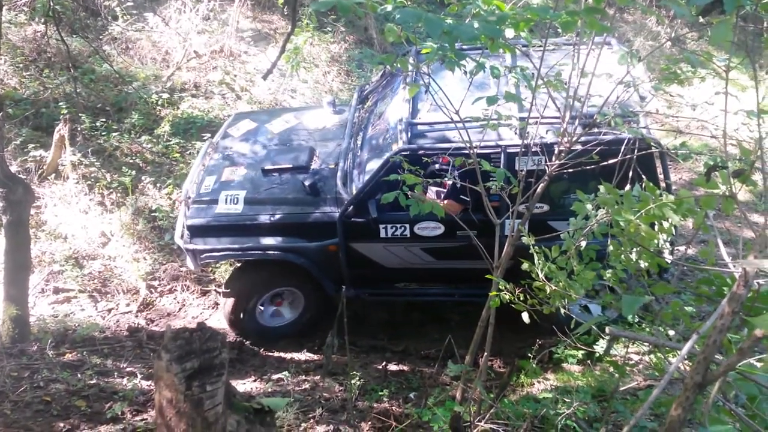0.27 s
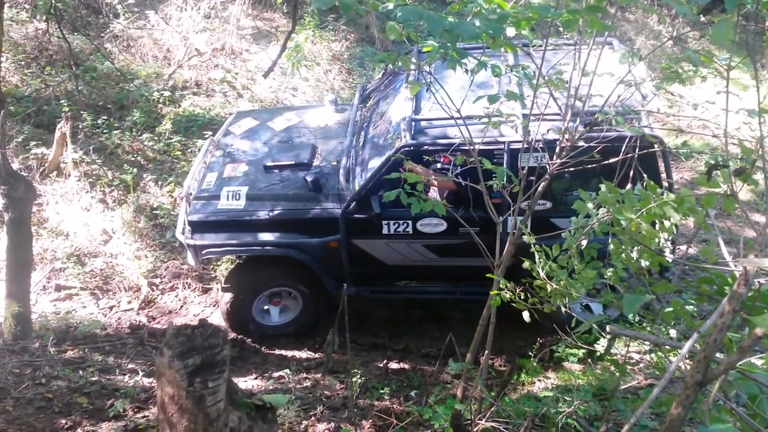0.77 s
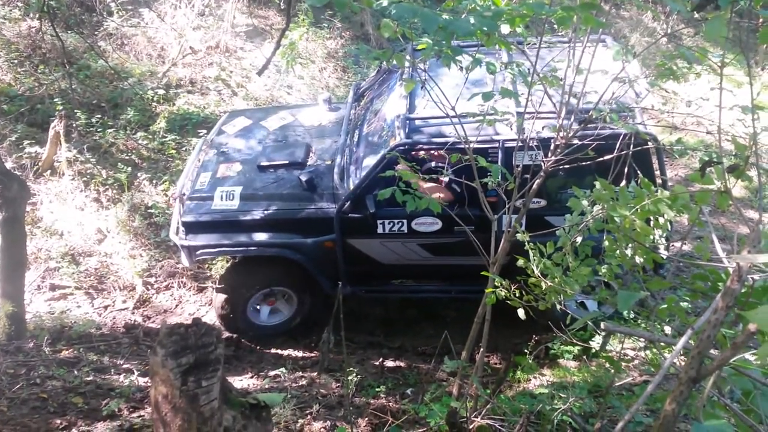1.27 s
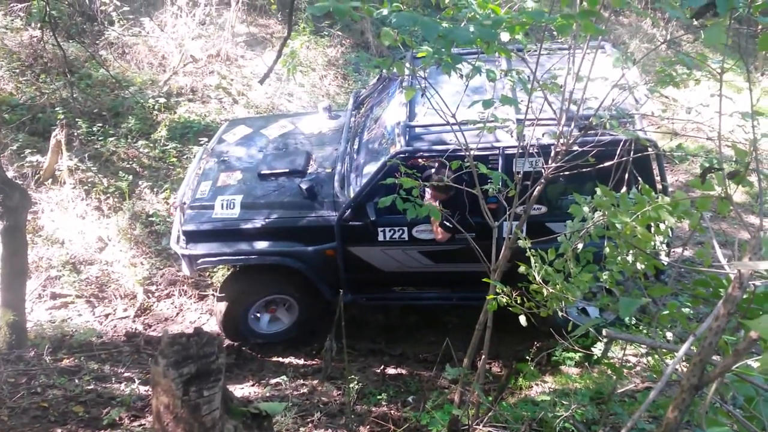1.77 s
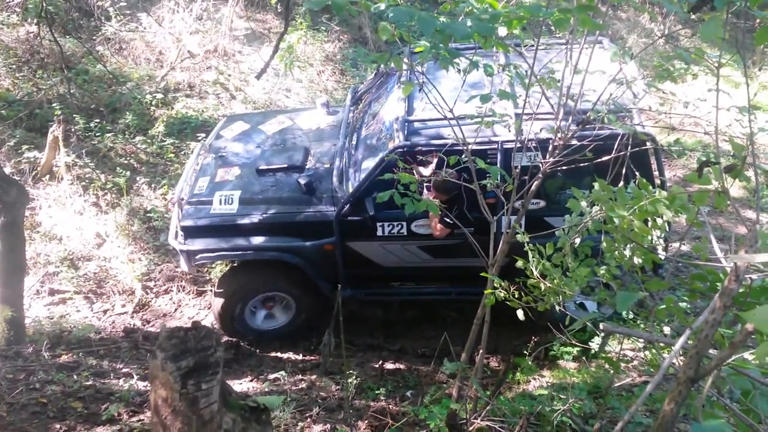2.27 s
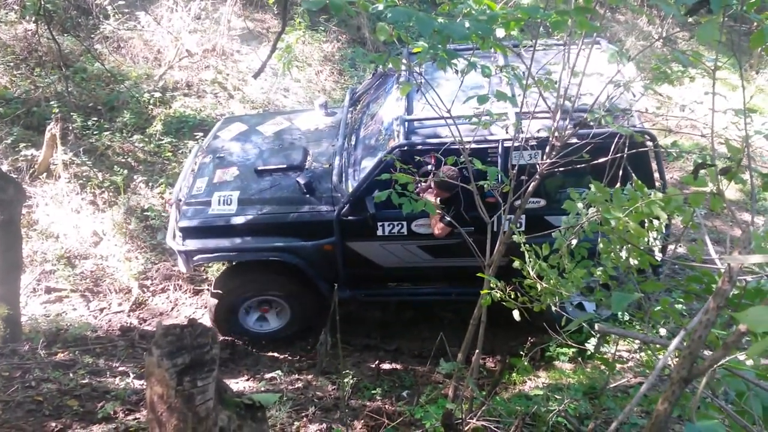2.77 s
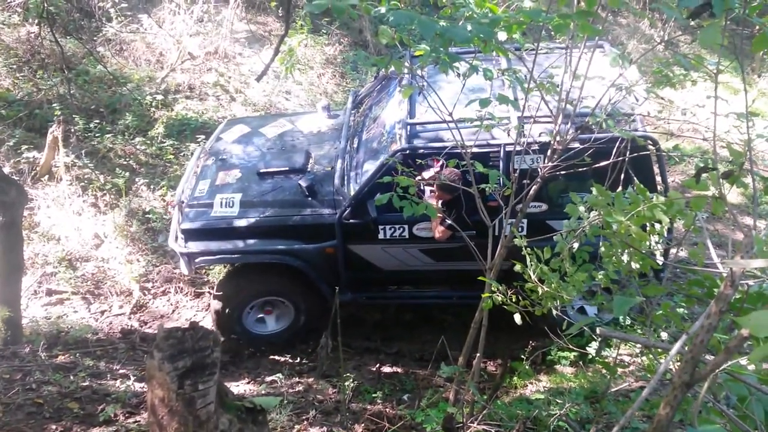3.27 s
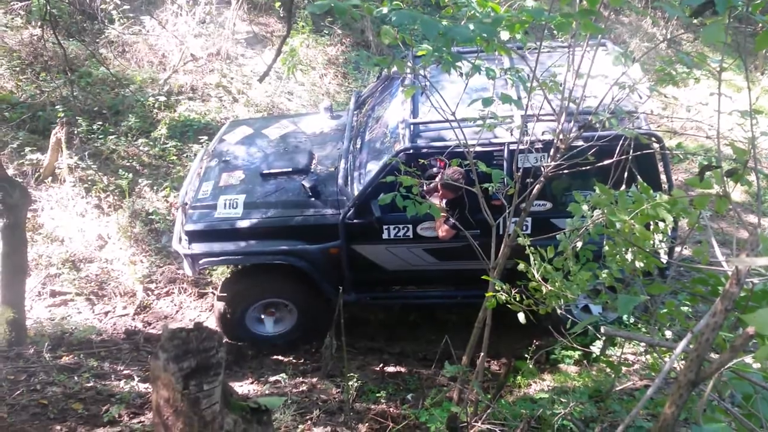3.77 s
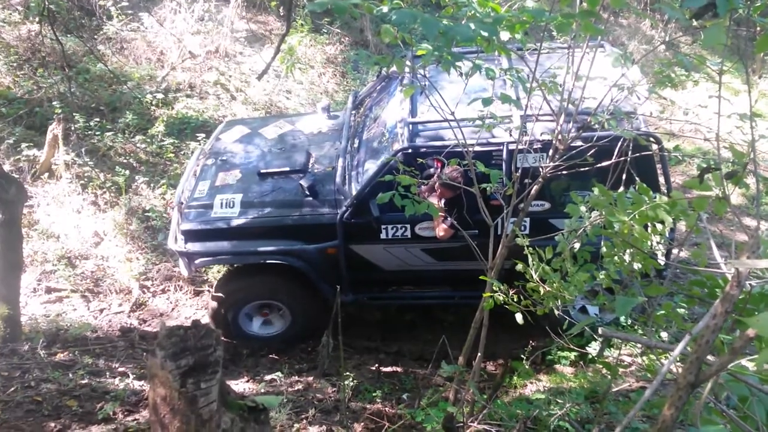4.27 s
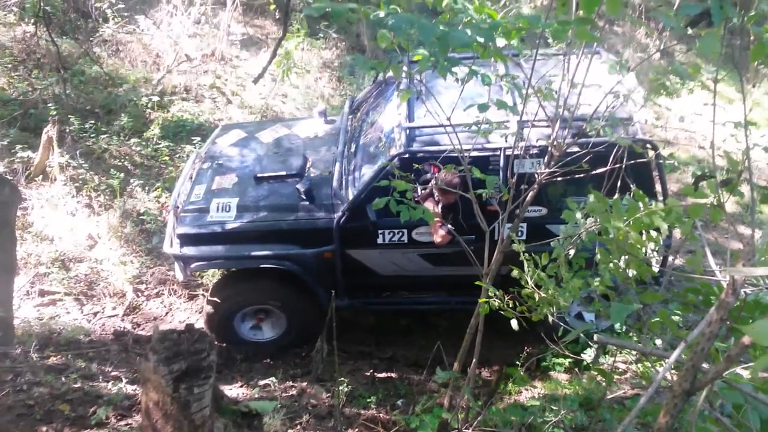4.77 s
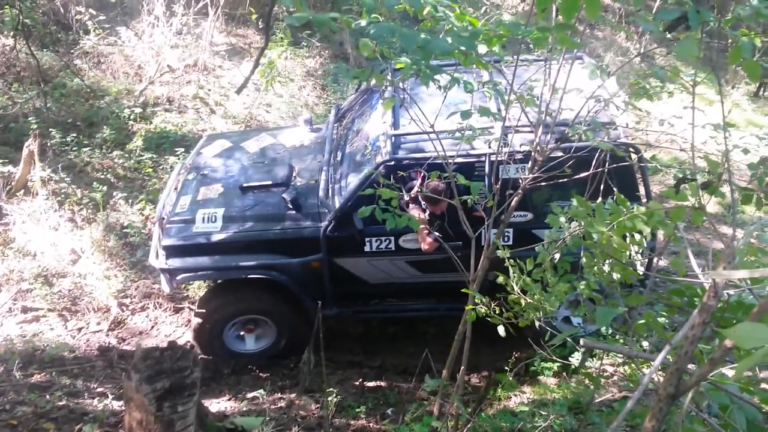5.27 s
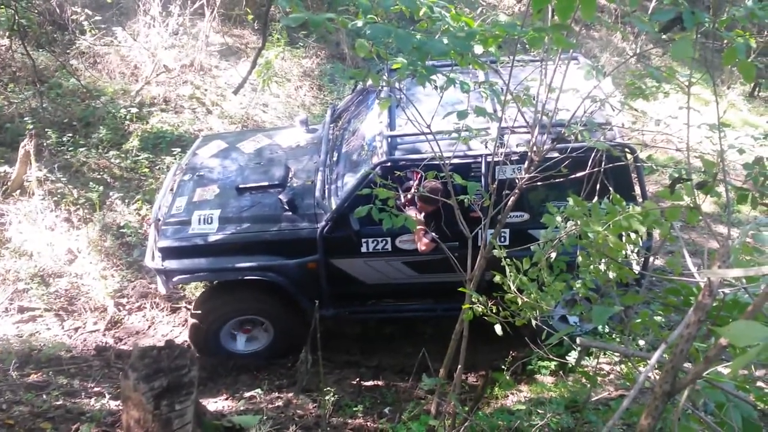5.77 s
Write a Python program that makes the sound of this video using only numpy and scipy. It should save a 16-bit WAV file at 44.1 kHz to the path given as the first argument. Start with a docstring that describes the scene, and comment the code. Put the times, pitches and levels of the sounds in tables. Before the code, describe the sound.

A six-cylinder turbo diesel off-roader stands a few metres away in woodland. It revs up quickly in the first half second with rattling ticks and sharp knocks, sags until under two seconds, then slowly climbs and holds before dropping at the very end. A high warbling turbo whistle and airy hiss ride over low exhaust boom and metallic clatter. Handheld stereo microphone, close and dry, slightly saturated.

```python
"""A six-cylinder turbo diesel works at raised revs a few metres away among trees.
Its exhaust is a boom of steady notes, all tied to one engine cycle of six firings.
The block and panels clatter as noise that swells with that cycle; loose parts tick and ring when the engine
picks up speed, and sharp knocks are short bursts of noise.
The turbo whistles a tone that warbles mainly once every two firings and echoes, over a hiss and a low rumble."""
import sys
import numpy as np
from scipy import signal
from scipy.fft import rfft, irfft, next_fast_len
from scipy.io import wavfile
from scipy.ndimage import uniform_filter1d

SR = 44100
rng = np.random.default_rng(int(sys.argv[2]) if len(sys.argv) > 2 else 0)


def store_wav(level_fs):
    """Save 16-bit WAV to argv[1]."""
    pcm = np.round(np.clip(np.atleast_2d(level_fs), -1, 1) * 32767)
    wavfile.write(sys.argv[1], SR, pcm.T.astype(np.int16))


N = 265129

# All dB levels are relative settings, before the final stage.
# Exhaust over time: t/s, firings f/Hz, firing note level/dB, half-rate note (every second firing) level/dB
EXHAUST_CURVE = [(0.0, 109.0, -17.5, -27.5), (0.14, 116.0, -15.0, -22.5), (0.3, 125.0, -12.0, -22.0),
                 (0.49, 137.9, -13.5, -23.0), (0.6, 140.3, -15.0, -24.0), (0.72, 137.0, -15.0, -27.5),
                 (1.12, 126.2, -15.0, -28.5), (1.5, 117.7, -16.5, -27.0), (1.7, 116.7, -16.5, -25.0),
                 (1.95, 118.0, -15.5, -25.5), (2.24, 121.4, -13.0, -24.0), (2.62, 122.1, -13.0, -24.5),
                 (2.9, 123.8, -11.5, -24.0), (3.22, 126.6, -14.0, -26.0), (3.7, 129.4, -14.0, -26.0),
                 (3.95, 128.5, -13.5, -26.0), (4.34, 131.6, -12.0, -25.0), (4.62, 132.3, -12.5, -25.5),
                 (4.88, 131.4, -13.0, -26.5), (5.2, 128.3, -12.0, -25.0), (5.44, 128.5, -12.0, -24.5),
                 (5.62, 130.1, -12.5, -25.0), (5.72, 129.6, -13.5, -26.5), (6.01, 108.0, -18.0, -30.5)]
# Notes left by unequal cylinders: multiple of the engine cycle, level/dB above the lumpy level
LUMPY_NOTES = [(7, -8), (8, -.5), (9, -5), (10, -17), (11, -12)]
# Other quiet exhaust notes: multiple of the engine cycle, level/dB
FAINT_NOTES = [(4, -46), (5, -37), (13, -52), (14, -52), (16, -51), (17, -44.5), (18, -52)]
# Loudness of the block and panels: t/s, level/dB
CLATTER_CURVE = [(0.0, -25.5), (0.18, -22), (0.63, -24.5), (0.8, -28.5), (1.45, -28), (1.6, -25),
                 (3.1, -24.5), (3.3, -26), (4.5, -25), (5.1, -25.5), (5.55, -23.5), (6.01, -29.5)]
# Colour of the block's noise: f/Hz, level/dB per Hz
CLATTER_COLOUR = [(400, -26), (480, 1.5), (600, 3.5), (900, 13.5), (1300, 8), (1700, 15.5), (2050, 8),
                  (2350, 5.5), (2620, -5), (2950, -2), (3700, -28), (4600, -24), (6000, -43), (12000, -44)]
# Ringing panels: f/Hz, width/Hz, level/dB
PANEL_RINGS = [(580, 37, -15), (745, 14.5, -12.5), (825, 30, -16.5), (1006, 220, -10), (1304, 100, -12),
               (1506, 64, -9), (2255, 200, -13.5), (2455, 42, -11.5), (2854, 85, -9), (3157, 130, -13.5)]
# Sharp knocks: t/s, starting level/dB, lowest f/Hz, highest f/Hz, time to fall 60 dB/s
KNOCK_EVENTS = [(.05, -25, 900, 1070, .1), (.109, -19, 2000, 3750, .1), (.195, -19, 1230, 1340, 0.18),
                (.21, -21, 3500, 3900, 0.076), (.275, -20, 2770, 3000, .1), (0.307, -14, 930, 1130, 0.09),
                (0.355, -25, 1500, 4500, 0.078), (0.394, -14.5, 250, 8200, 0.11),
                (.489, -36, 1500, 4230, .1), (.57, -20, 900, 1080, 0.13), (0.614, -27, 2000, 3600, 0.12),
                (1.923, -17.5, 4300, 8350, 0.08), (2.425, -20, 2140, 2820, 0.094),
                (2.619, -19.5, 2100, 2820, .08)]
# Pitch of the turbo whistle: t/s, f/Hz
WHISTLE_PITCH = [(0.0, 5600), (0.1, 5720), (0.24, 6140), (0.48, 7160), (0.6, 7500), (0.76, 7670),
                 (1.0, 7630), (1.6, 7050), (1.85, 6880), (2.05, 6840), (2.6, 7050), (3.4, 7350),
                 (4.0, 7490), (4.4, 7680), (4.95, 7745), (5.4, 7600), (5.72, 7620), (5.86, 7400),
                 (6.01, 6900)]
# Loudness and place of the whistle: t/s, level/dB, left minus right level/dB
WHISTLE_LEVEL = [(0.0, -28.5, 0), (0.16, -24, 1), (0.45, -21, 1.5), (0.6, -18, -2), (0.8, -23, 0.5),
                 (1.3, -22.5, 1), (1.95, -25, 5.5), (2.55, -21.5, 4), (2.9, -20.5, 0), (3.25, -18, 1.5),
                 (4.1, -17.5, -5.5), (4.85, -18, -5), (5.3, -17.5, -1.5), (5.7, -18.5, -3),
                 (6.01, -22.5, 2.5)]
# Paths of the whistle to each side: left delay/ms, left level/dB, right delay/ms, right level/dB
WHISTLE_PATHS = [(0, 4.5, 1.8, -7.5), (1.32, -16, 2.16, -1), (2.66, 2, 5, -3.5), (5.3, 0, 7.56, -7.5),
                 (9.7, 7.5, 4.7, -3), (14.1, -8, 16.5, -4)]
# Colour of the intake hiss: f/Hz, level/dB per Hz
HISS_COLOUR = [(4500, 3), (5800, 4.5), (7500, 13.5), (8500, 4), (10000, -2.5), (11500, -6), (12500, -27),
               (14400, -10), (14800, -44), (16000, -53)]
# Colour of the rumble under the exhaust notes: f/Hz, level/dB per Hz
RUMBLE_COLOUR = [(25, -16), (45, -37), (85, 3.5), (150, 6.5), (220, 4.5), (300, 3.5), (375, 3), (420, -3),
                 (520, -23)]
# How alike the noise is at the two microphone ports: f/Hz, likeness (0 to 1)
PORT_LIKENESS = [(60, .99), (270, .95), (500, .86), (800, .8), (1200, .62), (2500, .6), (5000, .5),
                 (9000, .25), (15000, .1)]
# How far the left port leads the right (negative: it lags): f/Hz, phase/rad
PORT_LEAD = [(900, 0), (1380, -0.13), (1720, -3), (2410, 0), (3880, -8), (5000, -8.5), (15000, -9)]
# Difference in loudness between the ports: f/Hz, left minus right level/dB
PORT_BALANCE = [(60, 1), (270, -0.5), (450, 1), (740, 3), (1220, 8), (2010, 11), (3330, 1), (5500, 0),
                (9080, -1.5), (15000, -5)]
# Brief dips in level, knocks left out: deepest point t/s, depth/dB, length/s
LEVEL_DIPS = [(0.061, 2, .04), (0.382, 7.5, 0.021), (1.466, 1, 0.087), (1.924, 1.5, 0.049)]

SILENCER_HZ, SILENCER_WIDTH_HZ, SILENCER_DB = 229, 12, 3
# Lumpy notes: level at low revs, firing rate where they start to fade, and loss above it
LUMPY_DB, LUMPY_KNEE_HZ, LUMPY_LOSS_DB_PER_HZ = -23, 115.4, 0.73
LUMPY_FOLLOWS = 0.5  # share of the clatter's ups and downs in dB
WARBLE_HZ, WARBLE_FROM_HZ, WARBLE_FULL_HZ = 205, 4900, 6800  # full warble; pitches where it starts, is full
HISS_DB, HISS_FOLLOWS = -26, 0.76  # level at mean clatter; share of the clatter's ups and downs in dB
RUMBLE_OVER_DB, RUMBLE_WAVER_DB = -8, 2.5  # level against the clatter setting; slow wavering
CUTOFF_HZ = 15838  # from here up, at least 70 dB is taken away
LEFT_RIGHT = np.array([[1], [-1]])  # plus for left, minus for right


def amp(db):
    """Turn dB into a gain."""
    return 10 ** (np.asarray(db) / 20)


def rms_one(x):
    """Scale a sound to an rms (average strength) of 1."""
    return x / np.sqrt(np.mean(x ** 2) + 1e-20)


def in_time(rows):
    """Join a table's points with straight lines: one value per sample for each column."""
    s, *columns = np.transpose(rows)
    return [np.interp(np.arange(N) / SR, s, c) for c in columns]


def at_hz(points, hz):
    """Read a table at a frequency, with frequency on a log scale."""
    f, value = np.transpose(points)
    return np.interp(np.log(hz + 1), np.log(f + 1), value)


def drift(rate_hz):
    """Random wandering of spread 1: smoothed noise, made at every tenth sample."""
    r = np.exp(-20 * np.pi * rate_hz / SR)
    noise = rng.standard_normal(N // 10 + 4002)
    slow = signal.lfilter([1], [1, -2 * r, r * r], noise)[4000:]  # skip the filter's start
    slow = rms_one(slow - slow.mean())
    return np.interp(np.arange(N) / 10, np.arange(len(slow)), slow)


def resonance(x, hz, width_hz):
    """Ring at one pitch with about gain 1 there; a narrower width rings longer."""
    r = np.exp(-np.pi * width_hz / SR)
    b = (1 - r * r) / 2 * np.array([1, 0, -1])
    return signal.lfilter(b, [1, -2 * r * np.cos(2 * np.pi * hz / SR), r * r], x)


def band(x, low_hz, high_hz):
    """Keep the sound between two frequencies."""
    return signal.sosfilt(signal.butter(2, [low_hz, high_hz], "band", fs=SR, output="sos"), x)


def port_noise(spectrum=((1, 0), (2, 0))):
    """Coloured noise at two ports: partly shared, shifted in phase, tilted to one side; overall rms 1."""
    size = next_fast_len(N)
    hz = np.arange(size // 2 + 1) * SR / size
    left, own = rfft(rng.standard_normal((2, size))) * amp(at_hz(spectrum, hz))
    alike = at_hz(PORT_LIKENESS, hz)
    shared = alike * left * np.exp(-1j * at_hz(PORT_LEAD, hz))
    right = shared + np.sqrt(1 - alike ** 2) * own
    tilt = amp(at_hz(PORT_BALANCE, hz) / 2)
    return rms_one(irfft(np.array([left * tilt, right / tilt]), size)[:, :N])


def exhaust(cycle, firing_db, half_db, lumpy_db):
    """Gas pulses heard as low notes locked to the engine cycle; the silencer rings on the lumpy ones."""
    def note(k, db, waver_db):
        """One note; 7 and 8 lead by a quarter period, other side notes lag by one, which evens the throb."""
        quarter = 0 if k in (3, 6) else 1 if k in (7, 8) else -1
        gain = np.sqrt(2) * amp(db + waver_db * drift(10))
        return gain * np.cos(k * cycle + np.pi / 2 * quarter)

    boom = note(6, firing_db, 0.9) + note(3, half_db, 0.5)
    lumpy = sum(note(k, db + lumpy_db, 1.5) for k, db in LUMPY_NOTES)
    faint = sum(note(k, db, 3.8) for k, db in FAINT_NOTES)
    ringing = amp(SILENCER_DB) * resonance(lumpy, SILENCER_HZ, SILENCER_WIDTH_HZ)
    mono = boom + lumpy + faint + ringing
    sides = mono * amp(0.65 * LEFT_RIGHT)  # left 0.65 dB up, right 0.65 dB down
    sides[0] = np.r_[np.zeros(2), sides[0, :-2]]  # it reaches the right port two samples sooner
    return sides


def clatter(cycle, level_db):
    """Combustion noise in block and panels, swelling in step with the engine cycle and the firings."""
    beat_db = 1.1 * np.cos(cycle) + 1.1 * np.cos(3 * cycle) + 0.8 * np.cos(6 * cycle)
    body = port_noise(CLATTER_COLOUR)
    out = np.zeros((2, N))
    edges = 300 * 2 ** np.arange(0, 5.6, 0.5)  # half-octave bands, in Hz
    for low, high in zip(edges, edges[1:]):  # each band flickers on its own
        out += band(body, low, high) * amp(1.42 * drift(17))
    # the noise that shakes the panels swells once a cycle
    blows = port_noise() * amp(0.7 * np.cos(cycle + 1.5) + 0.7 * drift(25))
    for k, (hz, width, db) in enumerate(PANEL_RINGS):
        sign = (-1) ** k  # every other panel is flipped
        out += sign * amp(db + 1.53 * drift(12)) * rms_one(resonance(blows, hz, width))
    return out * amp(level_db + beat_db)


def rattle(firing_hz):
    """Loose parts tick at random and ring briefly while the engine gains speed."""
    gain_hz_per_s = uniform_filter1d(np.gradient(firing_hz) * SR, size=SR // 5)
    pick_up = np.clip(gain_hz_per_s / 55 - 0.12, 0, 1)
    struck = rng.random(N) < 400 * pick_up / SR  # up to 400 ticks a second on average
    ticks = struck * amp(3 * np.minimum(rng.exponential(1, N), 3))
    pitches = np.geomspace(550, 3600, 24)  # Hz
    dealt = rng.integers(0, 24, N)  # which pitch each tick strikes
    out = np.zeros((2, N))
    for k, hz in enumerate(pitches):
        ring = resonance(ticks * (dealt == k) + 1e-18, hz, 40 + hz / 50)
        side_db = at_hz(PORT_BALANCE, hz) / 2 + 2 * rng.normal()
        out += ring * amp(LEFT_RIGHT * side_db)
    return out * amp(8.5)


def knocks():
    """Each knock is a sudden burst of noise in one band that dies fast."""
    out, noise = np.zeros((2, N)), port_noise()
    t = np.arange(SR // 5) / SR
    for s, db, low_hz, high_hz, t60 in KNOCK_EVENTS:
        at = round(s * SR)
        piece = noise[:, at:at + len(t)]
        burst = rms_one(band(band(piece, low_hz, high_hz), low_hz, high_hz))
        rise = np.minimum(t / 0.001, 1)  # 1 ms fade-in
        out[:, at:at + len(t)] += burst * amp(db - 60 * t / t60) * rise
    return out


def whistle(cycle, hz, warble_hz, level_db, pan_db):
    """Exhaust pulses vary the shaft speed, so the tone warbles; reflections turn warble into throb."""
    swing = np.sin(3 * cycle) + 0.4 * np.sin(6 * cycle) + 0.14 * np.sin(cycle) + 0.1156 * drift(55.3)
    phase = 2 * np.pi * np.cumsum(hz + warble_hz * swing) / SR
    heard, t = np.zeros((2, N)), np.arange(N) / SR
    for left_ms, left_db, right_ms, right_db in WHISTLE_PATHS:
        for side, (ms, db) in enumerate([(left_ms, left_db), (right_ms, right_db)]):
            late = (ms + 0.023 * drift(0.66)) / 1000  # paths change as the listener sways
            echo = np.sin(np.interp(t - late, t, phase))
            heard[side] += amp(db + 3 * drift(40)) * echo
    # even out each side over 0.2 s, so that the level table sets the loudness
    heard = heard / np.sqrt(uniform_filter1d(heard ** 2, size=SR // 5, axis=1))
    pulse_db = 0.84 * np.cos(cycle) + 1.6 * np.cos(3 * cycle)
    return heard * amp(level_db + pulse_db + pan_db / 2 * LEFT_RIGHT)


def intake(cycle, level_db):
    """Air rushing into the compressor: hiss that pulses once every two firings and flickers."""
    return port_noise(HISS_COLOUR) * amp(level_db + 0.57 * np.cos(3 * cycle) + 0.86 * drift(23))


def rumble(clatter_db):
    """Low noise under the exhaust notes, following the clatter level and wavering slowly."""
    return port_noise(RUMBLE_COLOUR) * amp(clatter_db + RUMBLE_OVER_DB + RUMBLE_WAVER_DB * drift(4))


def dips():
    """Gain with a smooth, brief drop at each dip."""
    t = np.arange(N) / SR
    return amp(-sum(db * np.exp(-((t - s) / (length / 2)) ** 2) for s, db, length in LEVEL_DIPS))


def scene():
    """Drive every layer from the engine's curves and mix them; the dips spare the knocks."""
    firing_hz, firing_db, half_db = in_time(EXHAUST_CURVE)
    clatter_db, = in_time(CLATTER_CURVE)
    swing_db = clatter_db - clatter_db.mean()
    shaft_hz, = in_time(WHISTLE_PITCH)
    cycle = 2 * np.pi * np.cumsum(firing_hz) / SR / 6  # angle: one round for six firings

    fade_db = LUMPY_LOSS_DB_PER_HZ * np.maximum(firing_hz - LUMPY_KNEE_HZ, 0)
    lumpy_db = LUMPY_DB - fade_db + LUMPY_FOLLOWS * swing_db
    engine = exhaust(cycle, firing_db, half_db, lumpy_db) + clatter(cycle, clatter_db) + rattle(firing_hz)

    # the warble is wider at a higher whistle pitch, up to its full width
    spin = np.minimum((shaft_hz - WARBLE_FROM_HZ) / (WARBLE_FULL_HZ - WARBLE_FROM_HZ), 1)
    turbo = whistle(cycle, shaft_hz, WARBLE_HZ * spin, *in_time(WHISTLE_LEVEL))
    air = intake(cycle, HISS_DB + HISS_FOLLOWS * swing_db)
    return (engine + turbo + air + rumble(clatter_db)) * dips() + knocks()


def record(dry):
    """Round the peaks slightly and cut the top of the treble."""
    rounded = 1.225 * np.tanh(dry / 1.183)
    return signal.sosfilt(signal.cheby2(12, 70, CUTOFF_HZ, fs=SR, output="sos"), rounded)


dry = scene()
out = record(dry)
store_wav(out)
```